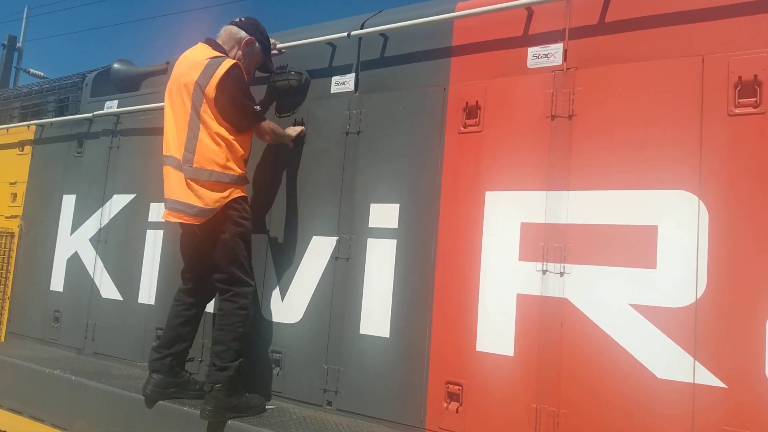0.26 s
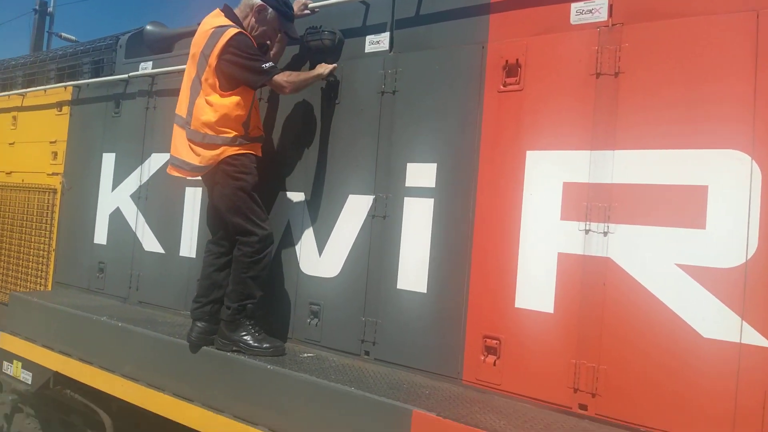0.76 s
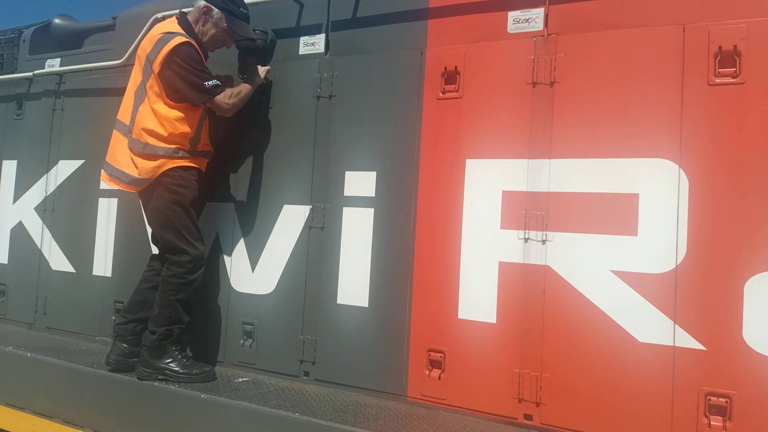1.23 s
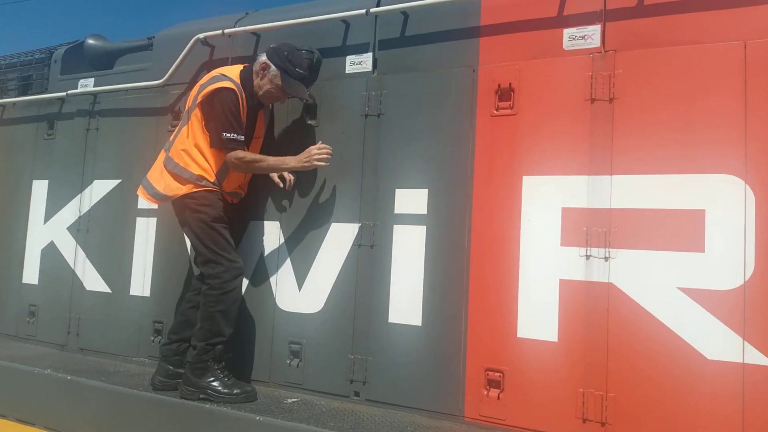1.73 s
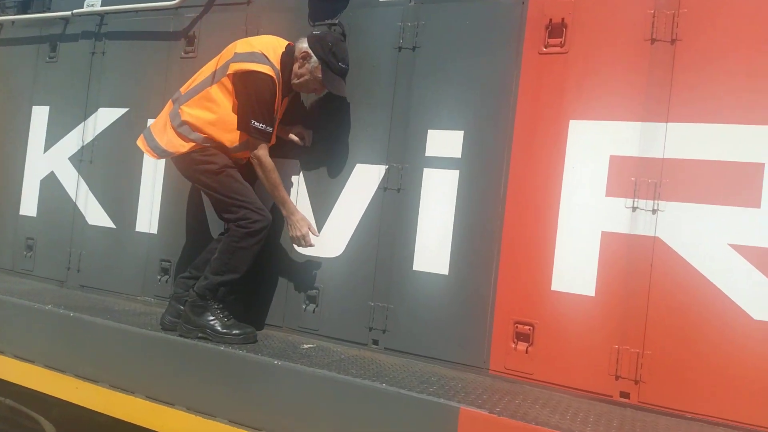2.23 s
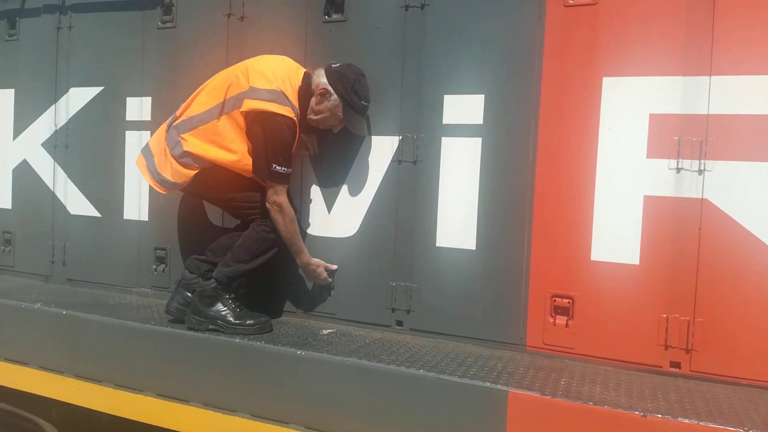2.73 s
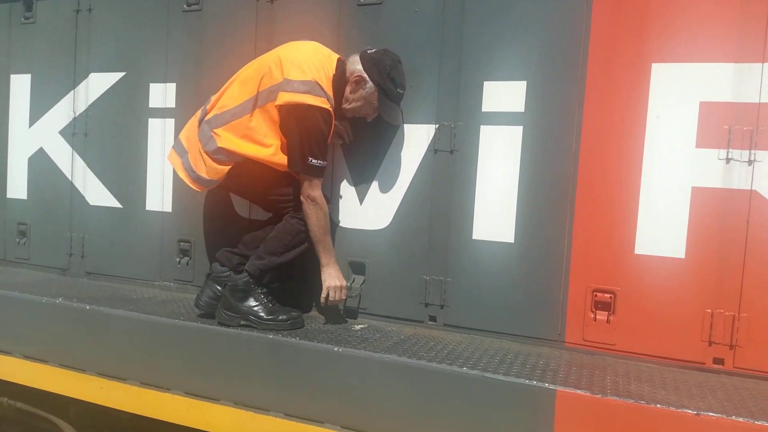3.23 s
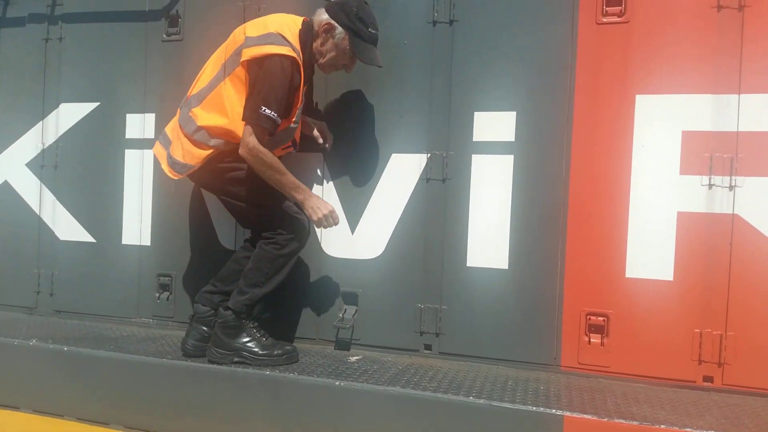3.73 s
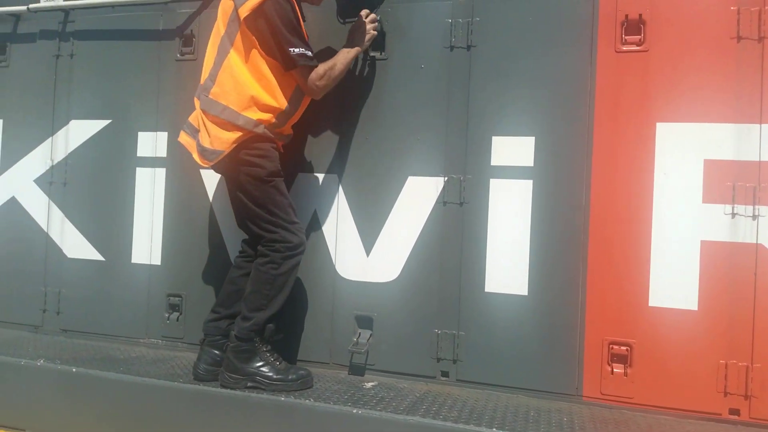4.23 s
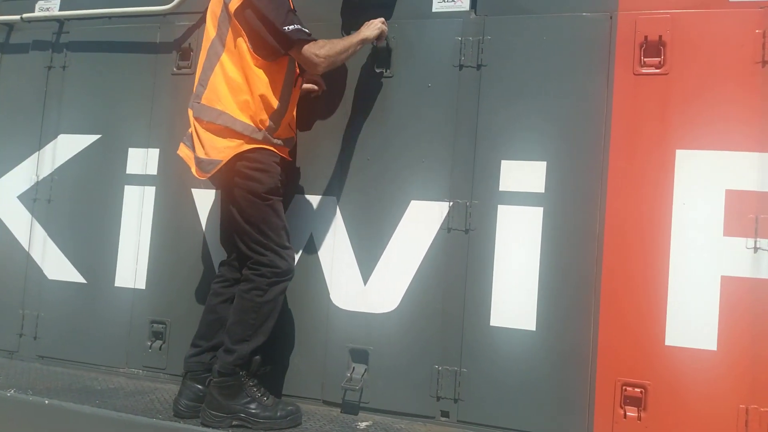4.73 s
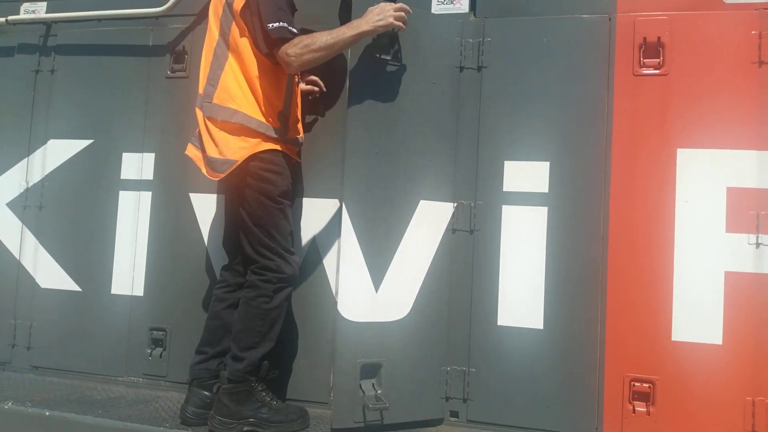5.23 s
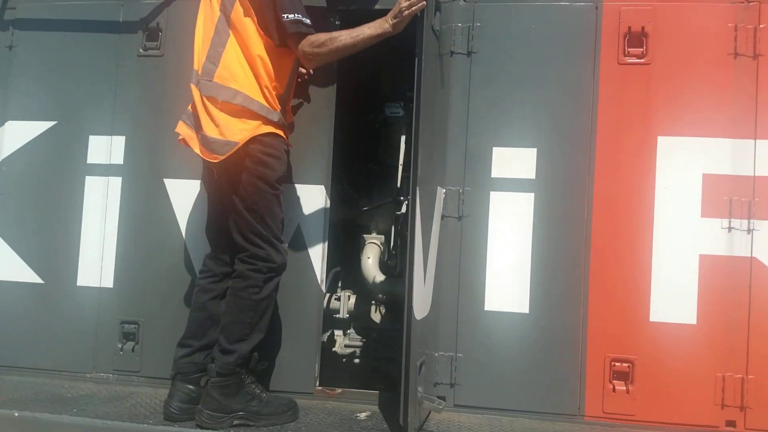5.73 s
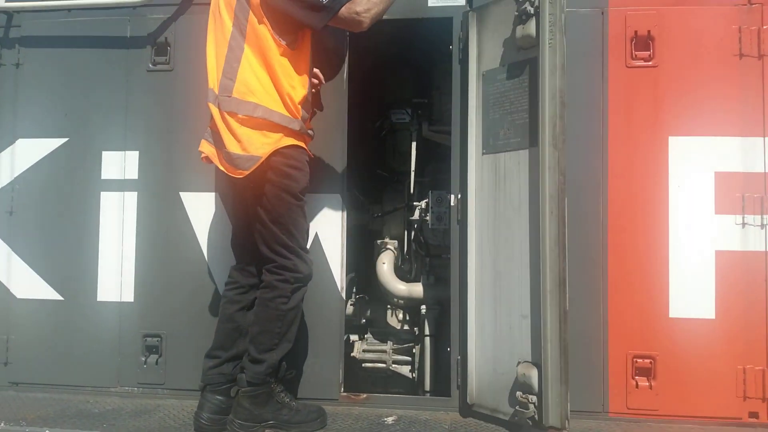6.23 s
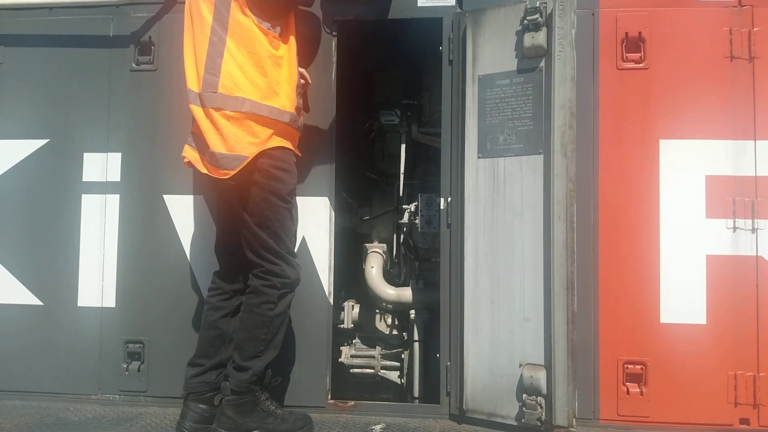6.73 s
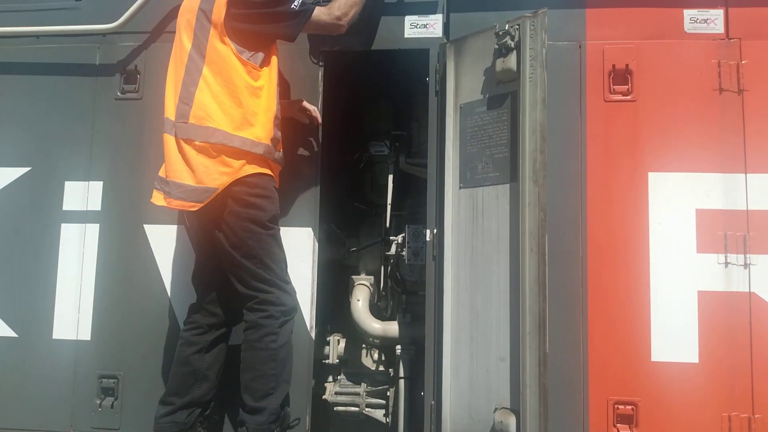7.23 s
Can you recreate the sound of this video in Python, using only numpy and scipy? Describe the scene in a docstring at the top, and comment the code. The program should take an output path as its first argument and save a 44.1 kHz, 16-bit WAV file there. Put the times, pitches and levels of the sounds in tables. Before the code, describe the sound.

A deep rumble, a low drone and the hiss of distant machinery run throughout in an open rail yard, with faint narrow whirs fading in and out. Boots scuff grit on a hollow steel walkway, the rumble swelling with each step. Light latch clicks come at about 0.4 to 0.7 seconds, and a few faint, short handle squeaks follow until 1.1 seconds. Soft steps continue to about 2.5 seconds. At 3.1 seconds a spring latch snaps free with a loud, sharp metal clack, followed by a smaller clack at 3.3 and light ticks until 3.6. More scuffs come between 4 and 5.6 seconds, with a faint tick near 5. At about 6.6 seconds the steel door bangs against the locomotive's body and quickly rattles to rest. One small click follows at 7.2 seconds. Everything is heard from a few metres away.

```python
"""A locomotive's steel engine-room door, a few metres from a phone in an open rail yard.
Its spring latches clack free, the handle squeaks, and the door bangs against the body and rattles to rest.
Boots scuff grit over the hollow steel walkway, and a deep rumble swells with each step.
Behind them lie a low drone, the hiss of far machinery and air, and narrow whirs that come and go.
The phone's two microphone ports colour everything differently."""
import sys
import numpy as np
from scipy import signal
from scipy.fft import rfft, irfft, next_fast_len
from scipy.io import wavfile
from scipy.ndimage import uniform_filter1d

SR = 44100
rng = np.random.default_rng(int(sys.argv[2]) if len(sys.argv) > 2 else 0)


def output_pcm(signal):
    """Save a mono or channel-first signal as 16-bit PCM at the path in sys.argv[1].

    Samples are clipped to [-1, 1] before scaling.
    """
    pcm = np.clip(np.atleast_2d(signal).T, -1, 1) * 32767
    wavfile.write(sys.argv[1], SR, np.round(pcm).astype(np.int16))


N = 329823
PORT_LAG_S = .00036  # sound from the right reaches the left port this late

# clear modes of latch and door: (frequency [Hz], relative level [dB], t60 before ring's cap [s])
LATCH_TONES = [(1490, -4, 0.064), (1743, -8, 0.07), (2250, 3, 0.013), (2720, 0, 0.047), (3290, 2, 0.075),
               (4120, -4, 0.056), (5570, -14, 0.025)]
DOOR_TONES = [(152, 3, .35), (286, 1, .35), (404, -5, .25), (445, -7, .2), (564, -1, .2), (592, -6, .18),
              (705, -4, .18), (966, -6, .16), (1095, -10, .15), (1182, -9, .15), (1385, -10, .13),
              (1561, -11, .13), (1792, -8, .13)]
# dense ring of steel between the modes: (band centre [Hz], relative level [dB], t60 [s])
LATCH_BANDS = [(486, 14, 0.13), (1130, 5.5, 0.074), (1980, -6, 0.09), (3840, 13.5, 0.058),
               (9200, -19.5, 0.25), (13000, -30, .03)]
DOOR_BANDS = [(66.6, -9, 0.61), (157, -9.5, 0.88), (260, -7, 1), (527, -1, 0.64), (780, -4.5, 0.25),
              (1030, -12.5, 0.88), (2350, 10.5, 0.12), (4750, 4, 0.75)]
# latch blows: (time [s], relative level [dB], colour [Hz], chatter to -20 dB [s], door share [dB])
LATCH_BLOWS = [(.441, -22.5, 3200, 0.03, -7), (.481, -21.5, 3220, 0.018, -11),
               (.671, -17.5, 1670, 0.014, -10), (3.065, -10.5, 3600, 0.02, -7.5),
               (3.0915, 13.5, 4000, 0.0014, -28.5), (3.0945, -6, 3200, 0.0054, -38),
               (3.1, -13.5, 3430, 0.066, -27), (3.278, -8.5, 5750, .02, -14),
               (3.284, 0.5, 1610, 0.0057, -14.5), (3.396, -25, 3000, 0.032, -10),
               (3.413, -23.5, 3520, 0.037, -8), (3.437, -22.5, 3650, 0.025, -4),
               (3.621, -25, 1800, 0.013, -8), (5.06, -26, 1190, 0.0041, -15.5),
               (7.197, -26.5, 2550, 0.02, -10)]


def door():
    """A few metres off, each blow cracks, chatters in the latch hardware and drums the door panel."""
    t = np.arange(SR // 8) / SR
    hardware = ring(LATCH_TONES, LATCH_BANDS, modes_db=-8, longest_s=.06, apart_hz=1800)
    panel = ring(DOOR_TONES, DOOR_BANDS, modes_db=0.38, longest_s=.4, apart_hz=800)
    out = np.zeros((2, N))
    # a light latch cannot move the whole leaf, so only the bang reaches the deep modes
    for blows, deepest_hz in ((LATCH_BLOWS, 260), (bang_and_rattle(), 60)):
        for s, db, colour_hz, chatter_s, door_db in blows:
            attack = np.minimum(t / min(0.13 * chatter_s, .0012), 1)
            envelope = attack * undb(db - 20 * t / chatter_s)
            contact = burst(envelope, 0.28 * colour_hz, 1.38 * colour_hz, gritty_db=0.59)
            add(out, s, undb(-20.5) * np.array([contact, contact]))
            add(out, s, undb(-12.0) * through(contact, hardware()))
            thump = burst(envelope, deepest_hz, 1460, gritty_db=2.3)
            add(out, s, undb(door_db) * through(thump, panel()))
    return out


# the door strikes the body: (time [s], relative level [dB], colour [Hz])
BANG_BLOWS = [(6.573, -2.5, 2800), (6.587, 1.5, 3350), (6.597, -4.5, 5040), (6.609, -3, 1950),
              (6.616, -8, 5460), (6.654, -9, 3000), (6.749, -22, 2200)]


def bang_and_rattle():
    """Rows of blows for door(): the bang, then uneven rebounds, ever weaker and duller."""
    chatter_s, bang_door_db, rebound_door_db = 0.019, -12.5, -6
    rebounds, from_s, gap_s = 11, 6.622, 0.023
    time_jitter, level_jitter = rng.standard_normal((rebounds, 2)).T
    since_s = (np.arange(rebounds) + .2 * time_jitter) * gap_s
    levels_db = -13.5 - 91 * since_s - 0.5 * level_jitter
    colours_hz = 2680 - 3000 * since_s
    bang = [(*blow, chatter_s, bang_door_db) for blow in BANG_BLOWS]
    rattle = [(*blow, chatter_s, rebound_door_db) for blow in zip(from_s + since_s, levels_db, colours_hz)]
    return bang + rattle


# squeaks at the door handle: (time [s], level [dB])
HANDLE_SQUEAKS = [(.7, -40), (.728, -35), (.85, -41), (.95, -42), (1.05, -39)]


def handle(pitch_hz=2050, length_s=0.0524):
    """Dry steel slips on steel in the pivot, giving short wavering tones."""
    n, smooth = int(length_s * SR), SR // 200
    out = np.zeros((2, N))
    for s, db in HANDLE_SQUEAKS:
        waver = uniform_filter1d(rng.standard_normal(SR // 4), smooth)[:n] * np.sqrt(smooth)
        phase = 2 * np.pi * np.cumsum(pitch_hz * (1 + .012 * waver)) / SR
        tone = undb(db) * np.hanning(n) * np.sin(phase)
        add(out, s - length_s / 2, np.array([tone, -.4 * tone]))
    return out


# clear modes and dense ring of the walkway: (frequency [Hz], relative level [dB], t60 [s])
PLATE_TONES = [(575, 0, .07), (700, -4, .06), (1120, -7, .05)]
PLATE_BANDS = [(316, -15, 0.36), (540, 6.5, 0.05), (1210, -5, 0.13), (2590, 8, 0.021), (4600, 1, 0.098),
               (9000, -29, 0.044)]
# steps: (time [s], scuff level [dB], fade to -10 dB [s], lower boom [dB], upper boom [dB])
BOOT_STEPS = [(.57, -44.5, 0.34, -14, -23), (.72, -41, 0.41, -22, -10), (1.049, -41.5, .2, -11.5, -32),
              (1.59, -41, 0.23, -12.5, -22), (1.92, -40.5, 0.2, -14.5, -24), (2.08, -45.5, 0.21, -35, -9.5),
              (2.42, -48, 0.49, -25, -19), (3.96, -41.5, 0.15, -24, -17.5), (4.319, -44.5, 0.22, -26, -19),
              (4.72, -49, .27, -40, -25), (5.29, -45.5, 0.17, -15.5, -19), (5.62, -45.5, 0.16, -31, -19)]


def boots(rise_s=.048, grit_db=-8):
    """On the walkway, soles drag grit over the tread plate; the phone hears plate and grit alike."""
    t = np.arange(SR // 2) / SR
    plate = ring(PLATE_TONES, PLATE_BANDS, modes_db=-9, longest_s=.2, apart_hz=1000)
    out = np.zeros((2, N))
    for s, db, fade_s, _, _ in BOOT_STEPS:
        drag = np.clip(t / rise_s, 0, 1) * undb(db - 10 * np.maximum(t - rise_s, 0) / fade_s)
        scuff = burst(drag, 170, 4400, gritty_db=3.02)
        add(out, s - rise_s, through(scuff, plate()))
        grit = np.array([burst(drag, 1440, 5450, gritty_db=1.0) for _ in range(2)])
        add(out, s - rise_s, undb(grit_db) * grit)
    return out


# deep resonances: (centre [Hz], width [Hz], relative level [dB])
LOWER_RESONANCES = [(39.3, 42, -9), (48.5, 17, -3), (65.3, 11, 0.5)]
UPPER_RESONANCES = [(71.1, 10.3, -1.3), (89.7, 6.7, -2.2)]
# the low end between steps: (time [s], lower boom [dB], upper boom [dB], drone [dB])
LOW_LEVELS = [(0, -17.5, -38, -35), (.3, -31.5, -24, -40), (.45, -21, -23, -28.5), (1.3, -32, -23.5, -32.5),
              (2.3, -19, -37, -33), (2.75, -24.5, -32, -36.5), (3.5, -26.5, -30.5, -29),
              (4.5, -23.5, -25, -37.5), (5.1, -23.5, -43, -27), (5.8, -24, -33, -37),
              (6.1, -29.5, -28.5, -48), (6.4, -26, -33, -33), (6.9, -19.5, -37, -29),
              (7.48, -22, -31.5, -42.5)]


def rumble():
    """Two booms from the right: steps swell both, and the bang shakes the body in the lower one."""
    shaken_body = swell(BANG_BLOWS[0][0] + 0.072, db=-13, rise_s=0.12, fall_s=0.15)
    # (resonances, power from the bang, lead before the scuff [s], rise [s], fall [s])
    booms = [(LOWER_RESONANCES, shaken_body, .01, 0.06, 0.16), (UPPER_RESONANCES, 0, .04, 0.021, 0.062)]
    out = 0
    for k, (modes, bang_power, lead_s, rise_s, fall_s) in enumerate(booms):
        step_power = sum(swell(step[0] - lead_s, step[3 + k], rise_s, fall_s) for step in BOOT_STEPS)
        power = undb(curve(LOW_LEVELS, k + 1)) ** 2 + bang_power + step_power
        boom = sum(undb(db) * narrow(hz, width) for hz, width, db in modes)
        # the boom holds its size better than free noise does
        boom = boom / uniform_filter1d(boom ** 2, SR // 10) ** .5
        out = out + np.sqrt(power) * boom / boom.std()
    return from_right(out)


def drone():
    """A broad low hum above the booms that swells slowly, alike at both ports."""
    hum = narrow(107.0, width_hz=38) + narrow(207.8, width_hz=110)
    return undb(curve(LOW_LEVELS, column=3)) * hum / hum.std()


# open-air noise of the yard: (frequency [Hz], density [dB per Hz])
YARD_SPECTRUM = [(20, -85), (35, -40), (90, -59.5), (120, -53.5), (200, -54), (320, -59.5), (420, -71),
                 (800, -70.5), (1000, -75.5), (2200, -79.5), (4000, -77), (7000, -84.5), (11000, -86.5),
                 (16000, -100)]
# the part of it that comes from one side: (frequency [Hz], power share [0-1])
SIDE_SHARE = [(60, 0.68), (300, 1), (600, 0.68), (1500, 0.61), (5000, 0), (8000, 0), (12000, 0.6)]
# the hiss grows as the phone comes nearer: (time [s], treble gain [dB])
HISS_GAIN = [(0, -2.5), (2.5, -2), (4, -0.5), (5.5, -0.34), (7.48, 0.7)]


def yard():
    """Far machinery and air, part from the right, part diffuse; lows and hiss waver separately."""
    def density(hz):
        return np.sqrt(SR / 2) * undb(along(hz, YARD_SPECTRUM, 1))

    side = shape(rng.standard_normal(N), lambda f: density(f) * np.sqrt(along(f, SIDE_SHARE, 1)))
    late = shape(side, lambda f: np.exp(-2j * np.pi * f * PORT_LAG_S))
    white = rng.standard_normal((2, N))
    diffuse = shape(white, lambda f: density(f) * np.sqrt(1 - along(f, SIDE_SHARE, 1)))
    noise = np.array([late, side]) + diffuse
    low = signal.sosfiltfilt(signal.butter(2, 1500, fs=SR, output="sos"), noise)
    low_db = 1.8 * wander(3.2)
    hiss_db = curve(HISS_GAIN, 1) + 0.3 * wander(3.5)
    return undb(low_db) * low + undb(hiss_db) * (noise - low)


# background hums and hisses: (centre [Hz], width [Hz], level when fully in [dB], start [s], end [s])
WHIR_BANDS = [(2300, 440, -55, 1.3, 7.6), (324, 14, -53.5, 3.65, 3.3), (329.6, 9, -40.5, 5, 7.2),
              (4930, 120, -57, 1.0, 2.4), (6820, 190, -59.5, -3, 3.5), (7680, 380, -60.5, 7, 7.8)]


def whir(fade_s=0.91):
    """Narrow bands of noise fade in and out to the right of the phone."""
    t = np.arange(N) / SR
    out = 0
    for hz, width, db, start_s, end_s in WHIR_BANDS:
        fade = np.clip(np.minimum(t - start_s, end_s - t) / fade_s, 0, 1)
        out = out + undb(db) * narrow(hz, width) * fade
    return from_right(out)


def ring(modes, haze, modes_db, longest_s, apart_hz):
    """Maker of stereo responses of a steel part: modes (t60 capped at longest_s) plus fading noise.
    Every call strikes another spot; above apart_hz the two ports hear different fronts."""
    t = np.arange(SR // 3) / SR
    hz, db, t60 = np.array(modes, float).T[:, :, None]
    tones = undb(db + modes_db - 60 * t / np.minimum(t60, longest_s)) * np.exp(2j * np.pi * hz * t)
    spread = np.minimum(hz[:, 0] / apart_hz, 2)
    bands, fades = [], []
    for hz, db, t60 in haze:
        alike = 1 / (1 + (hz / apart_hz) ** 2)
        common = np.sqrt(alike) * rng.standard_normal(SR)
        separate = np.sqrt(1 - alike) * rng.standard_normal((2, SR))
        octave = signal.butter(2, [hz / np.sqrt(2), hz * np.sqrt(2)], "band", fs=SR, output="sos")
        noise = signal.sosfilt(octave, common + separate)
        bands.append(noise / noise.std())
        fades.append(undb(db - 60 * t / t60))

    def strike():
        phase, port_skew, strength = rng.standard_normal((3, len(modes)))
        start = rng.integers(SR - len(t))
        turn = np.exp(1j * (np.pi * phase + np.outer([1, -1], spread * port_skew) / 2))
        out = np.real((undb(2.6 * strength) * turn) @ tones)
        out = out + sum(band[:, start:start + len(t)] * fade for band, fade in zip(bands, fades))
        return out / np.sqrt(np.sum(out ** 2) / 2)
    return strike


def burst(envelope, low_hz, high_hz, gritty_db):
    """Uneven contacts between two frequencies, with the outline and energy of the envelope."""
    grit = rng.standard_normal(len(envelope)) * undb(gritty_db * rng.exponential(size=len(envelope)))
    edges = np.clip([low_hz, high_hz], 20, .45 * SR)
    push = signal.sosfilt(signal.butter(2, edges, "band", fs=SR, output="sos"), envelope * grit)
    return push * np.sqrt(np.sum(envelope ** 2) / np.sum(push ** 2))


def through(push, response):
    """Ring a steel part with a push."""
    return signal.fftconvolve(push[None], response, axes=1)


def narrow(hz, width_hz):
    """Noise of rms 1 in one steep resonance."""
    x = shape(rng.standard_normal(N), lambda f: 1 / (1 + (2 * (f - hz) / width_hz) ** 2))
    return x / x.std()


def swell(s, db, rise_s, fall_s):
    """Power of a hump that peaks at time s: a rounded rise, then 10 dB less every fall_s."""
    t = np.arange(N) / SR - s
    return undb(db - 10 * np.where(t < 0, (t / rise_s) ** 2, t / fall_s)) ** 2


def wander(rate):
    """Random levels held 1 / rate s and slewed twice."""
    hold = int(SR / rate)
    levels = np.repeat(rng.standard_normal(N // hold + 1), hold)
    return uniform_filter1d(uniform_filter1d(levels, hold), hold)[:N]


def from_right(x):
    """Stereo pair in which the left port hears x late."""
    return np.array([np.roll(x, int(PORT_LAG_S * SR)), x])


def add(track, s, x):
    """Mix x into a stereo track from time s."""
    i = int(s * SR)
    track[:, i:i + x.shape[1]] += x[:, :N - i]


def shape(x, gain):
    """Multiply the spectrum by gain(Hz)."""
    n = next_fast_len(N)
    hz = np.maximum(np.fft.rfftfreq(n, 1 / SR), 1)
    return irfft(rfft(x, n) * gain(hz), n)[..., :N]


def along(hz, table, column):
    """Read one column of a table on a log-frequency axis."""
    table = np.array(table, float)
    return np.interp(np.log(hz), np.log(table[:, 0]), table[:, column])


def curve(table, column):
    """One column of a table of times, sample by sample."""
    table = np.array(table, float)
    return np.interp(np.arange(N) / SR, table[:, 0], table[:, column])


def undb(db):
    """Decibels to gain."""
    return 10 ** (np.asarray(db) / 20)


def scene():
    """Everything that reaches the phone, a few metres from the locomotive."""
    return door() + boots() + handle() + rumble() + drone() + yard() + whir()


# cavity colour of the microphone ports: (frequency [Hz], left gain [dB], right gain [dB])
PORT_COLOUR = [(107, -0.34, 1), (370, -4, -4.1), (905, -2.5, -4), (2120, 6, -1.5), (3720, -3, -4.5),
               (5890, 0, -0.5), (7230, 14, -1), (8340, 5.5, -0.5), (10070, -6.5, 8), (12800, -7.5, 6.5),
               (15500, 10, 3)]


def record(dry, top_hz=15700):
    """The phone: each port has its own cavity colour, peaks clip at full scale, the top is cut."""
    coloured = shape(dry, lambda f: undb([along(f, PORT_COLOUR, 1), along(f, PORT_COLOUR, 2)]))
    top_cut = signal.ellip(10, .2, 80, top_hz, fs=SR, output="sos")
    return signal.sosfilt(top_cut, np.clip(coloured, -1, 1))


dry = scene()
out = record(dry)
output_pcm(out)
```